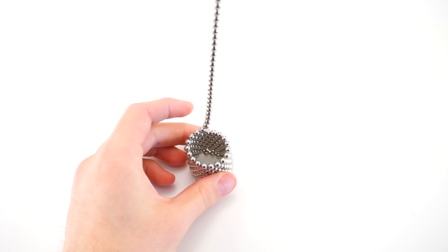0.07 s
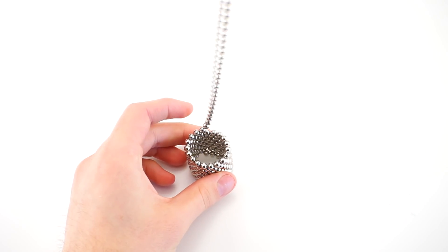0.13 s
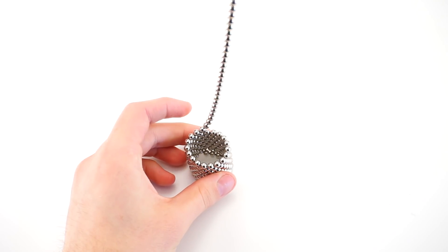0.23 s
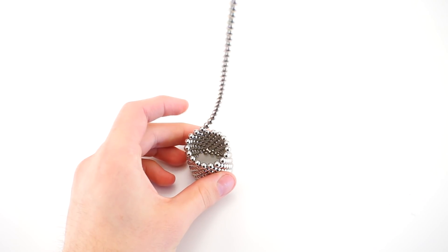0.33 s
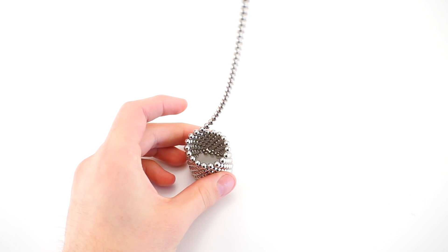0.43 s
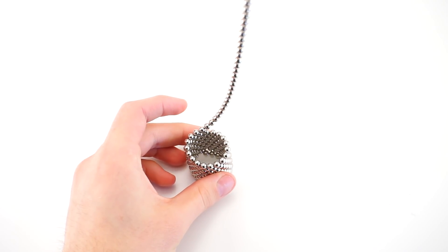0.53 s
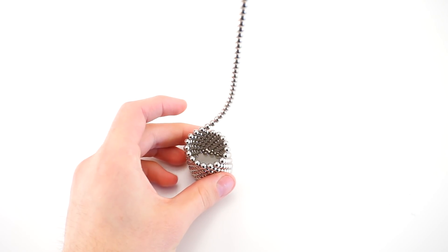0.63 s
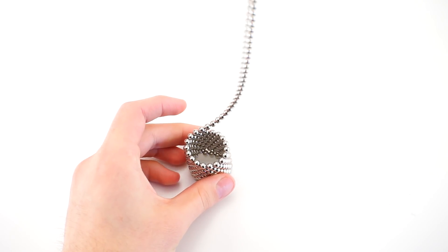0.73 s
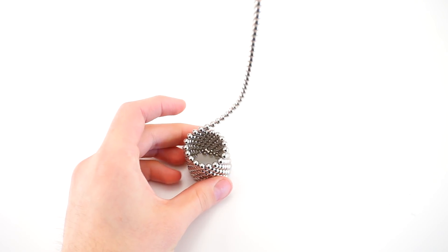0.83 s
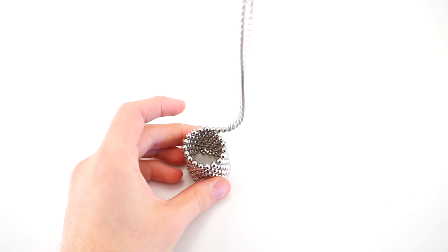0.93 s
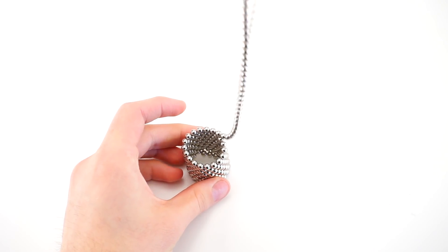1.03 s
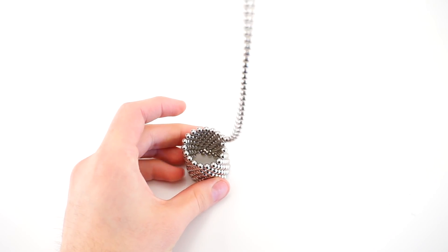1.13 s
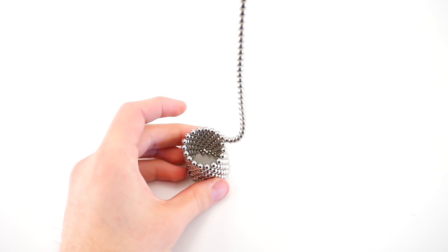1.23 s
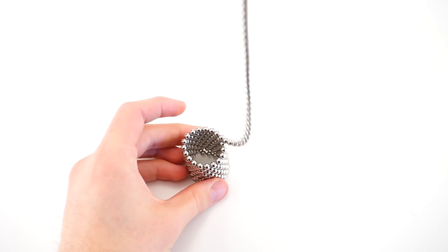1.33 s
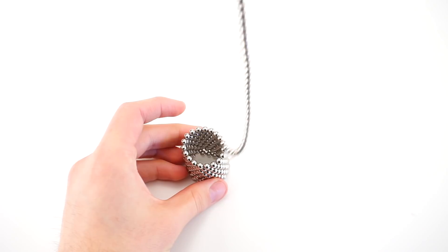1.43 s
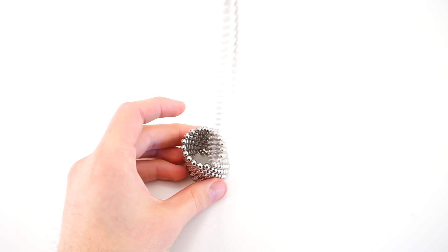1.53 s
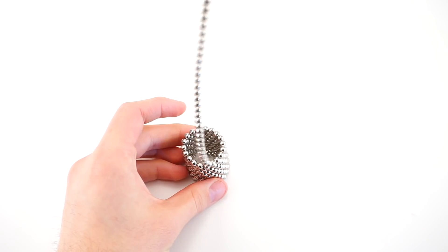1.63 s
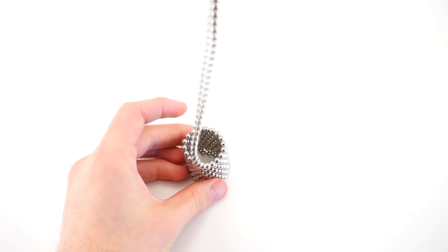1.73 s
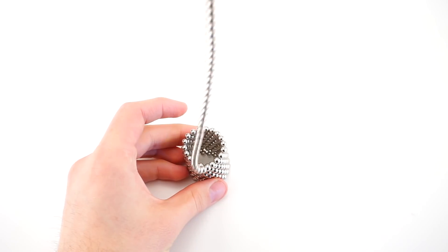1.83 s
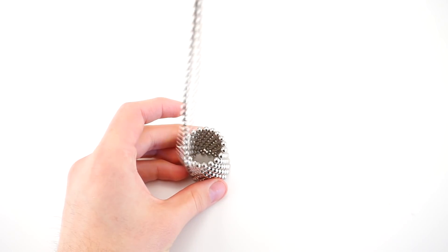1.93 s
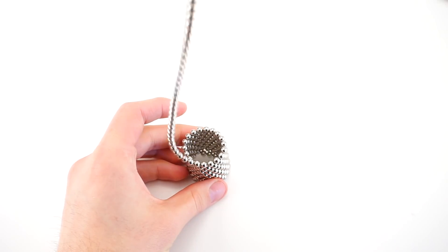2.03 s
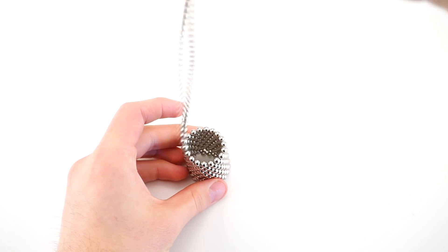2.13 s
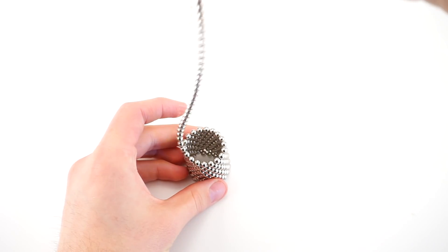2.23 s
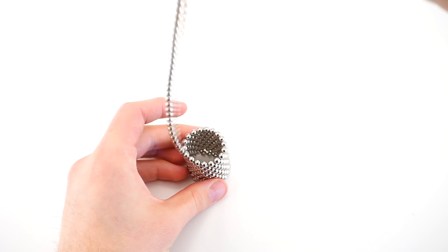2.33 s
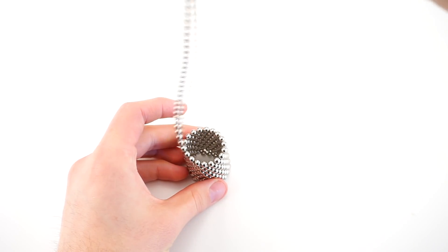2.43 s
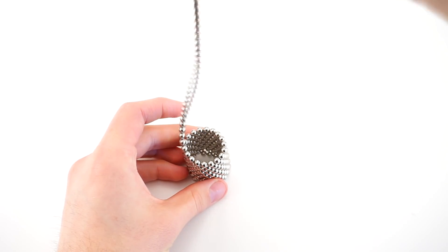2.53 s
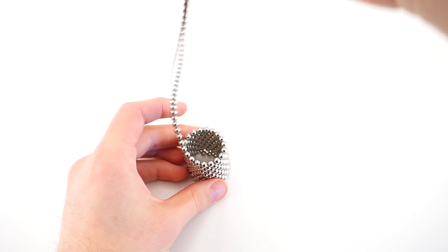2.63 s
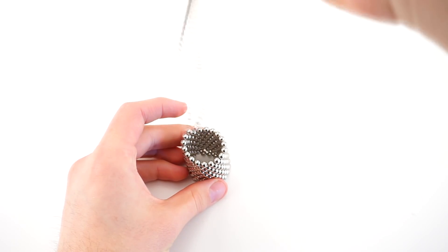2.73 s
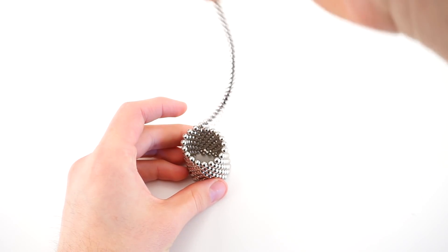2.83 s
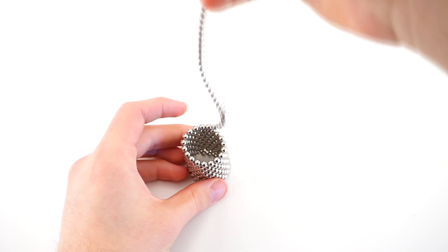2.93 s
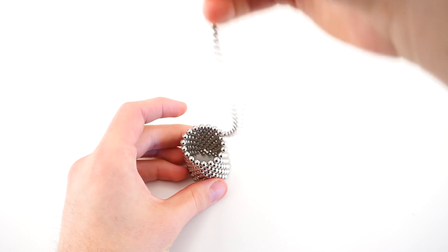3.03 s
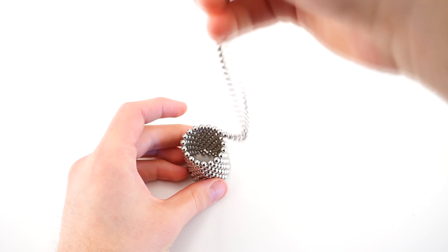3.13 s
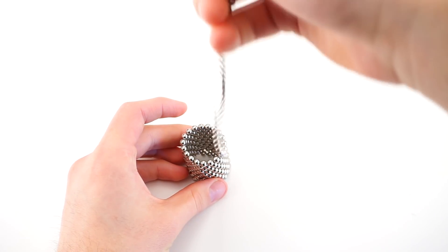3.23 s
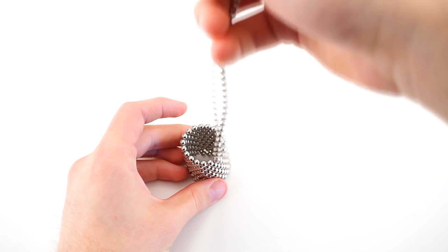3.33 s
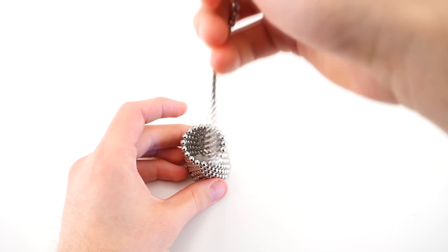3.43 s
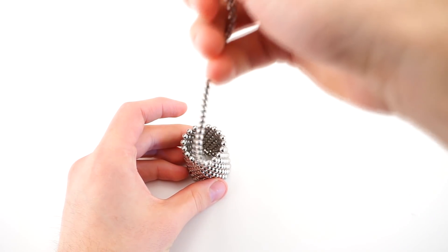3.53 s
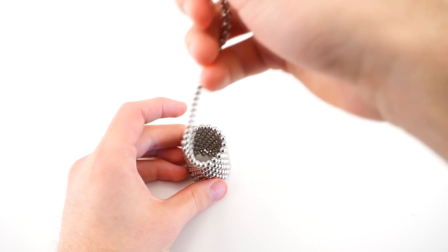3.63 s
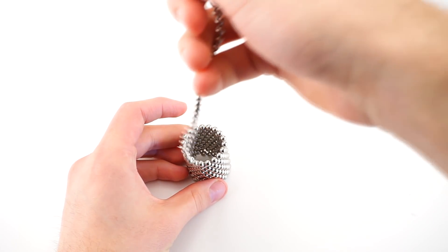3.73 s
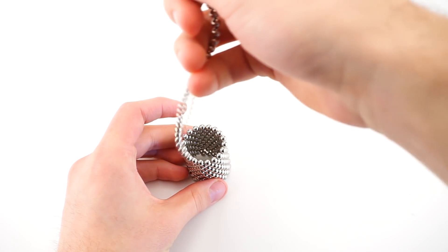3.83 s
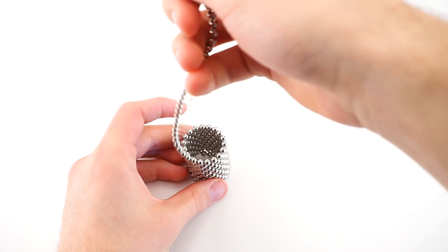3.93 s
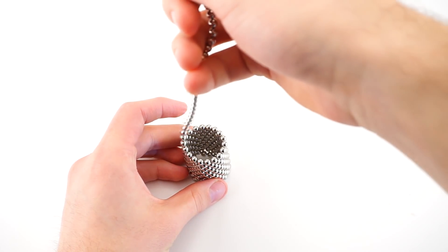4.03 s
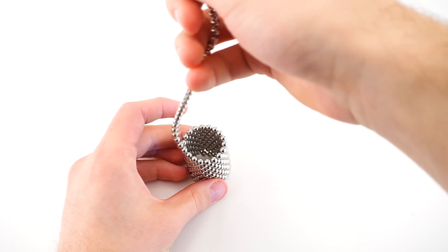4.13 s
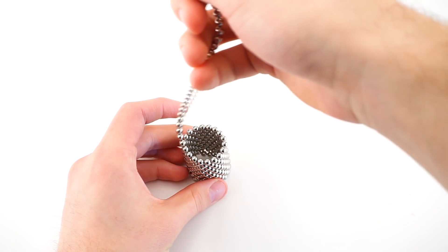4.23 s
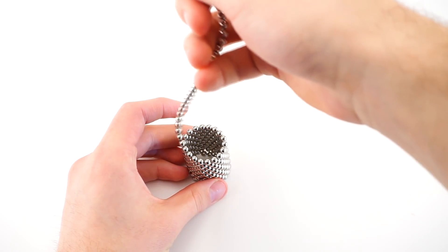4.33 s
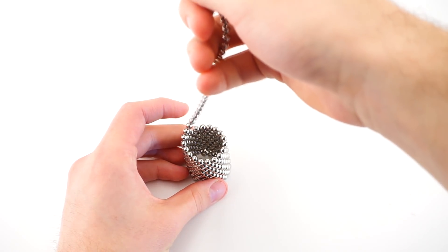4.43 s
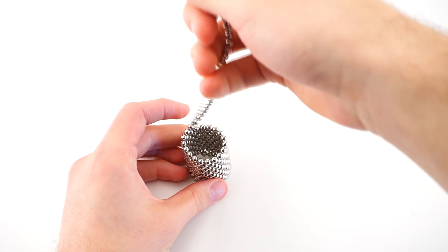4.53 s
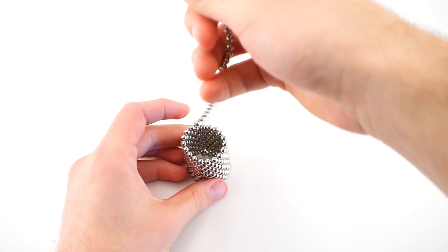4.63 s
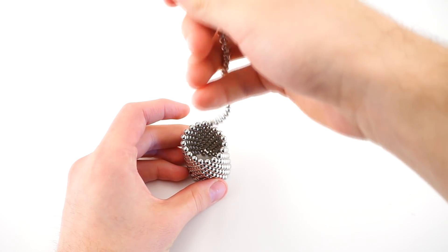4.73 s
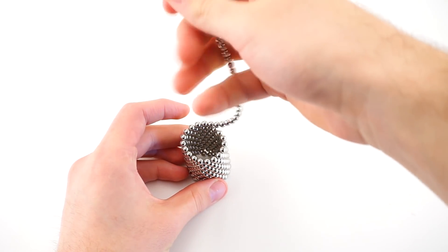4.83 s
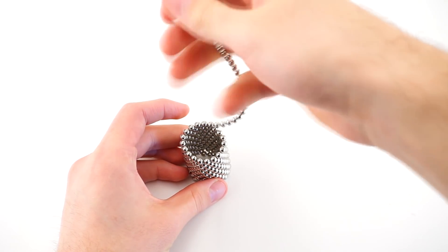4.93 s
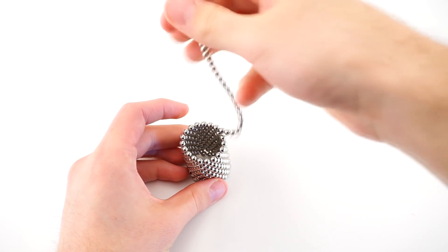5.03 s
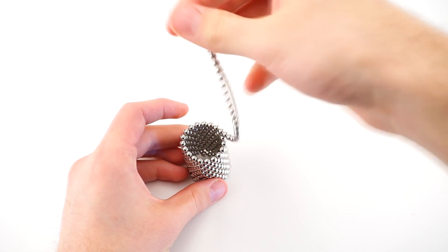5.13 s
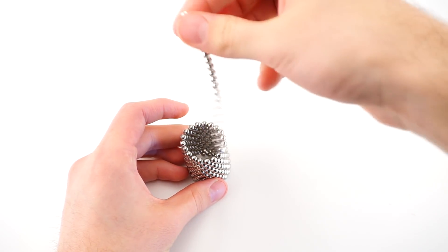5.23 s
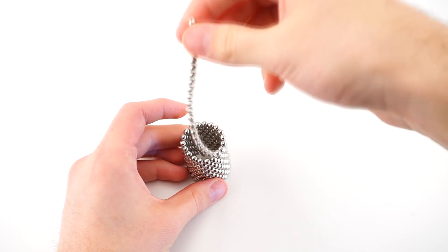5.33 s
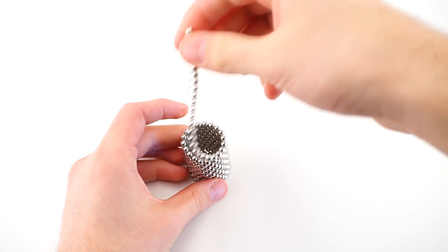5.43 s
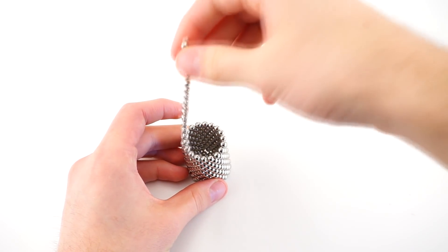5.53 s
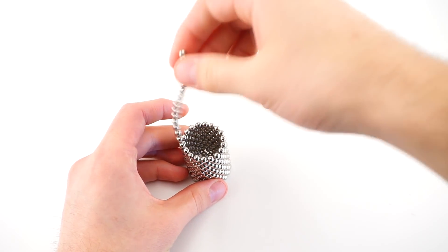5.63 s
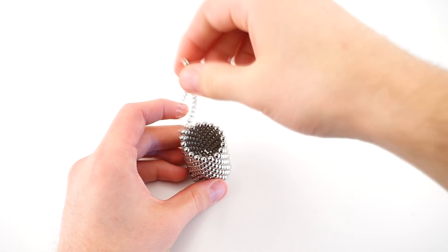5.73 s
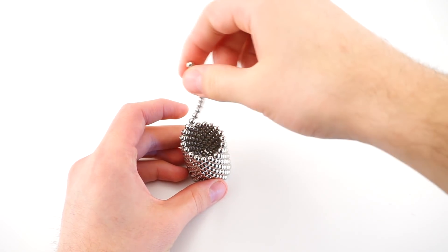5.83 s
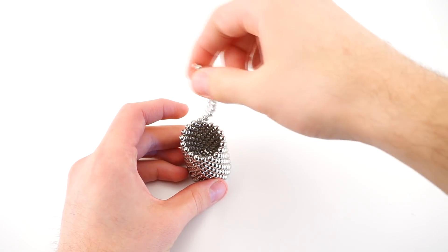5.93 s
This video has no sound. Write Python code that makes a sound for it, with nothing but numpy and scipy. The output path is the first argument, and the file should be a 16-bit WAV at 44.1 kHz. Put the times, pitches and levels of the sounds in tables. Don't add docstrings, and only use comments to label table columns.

```python
import sys
import numpy as np
from scipy import signal
from scipy.io import wavfile
from scipy.ndimage import uniform_filter1d

SR = 44100
rng = np.random.default_rng(int(sys.argv[2]) if len(sys.argv) > 2 else 0)


def pcm_store(signal):
    levels = np.round(np.clip(np.atleast_2d(signal), -1, 1) * 32767)
    wavfile.write(sys.argv[1], SR, levels.astype(np.int16).T)


def convert_level_to_amplitude(level_db):
    exponent = np.asarray(level_db, float) / 20
    return 10 ** exponent


N = 263718


def rms_one(x):
    return x / np.sqrt(np.mean(x ** 2) + 1e-20)


def at_hz(rows, hz):
    at, *columns = np.transpose(rows)
    return [np.interp(np.log(hz), np.log(at), c) for c in columns]


def ring(clicks, hz, t60_s):
    r = convert_level_to_amplitude(-60 / (t60_s * SR))
    w = 2 * np.pi * hz / SR
    return signal.lfilter([0, np.sin(w)], [1, -2 * r * np.cos(w), r * r], clicks + 1e-18)


def dying(t60_s, size):
    return convert_level_to_amplitude(-60 * np.arange(size) / SR / t60_s)


def bandpass(x, order, low_hz, high_hz):
    return signal.sosfilt(signal.butter(order, [low_hz, high_hz], "band", fs=SR, output="sos"), x)


def bands(size):
    edges_hz = 20 * 2 ** np.arange(0, 10.1, .5)
    white = rng.standard_normal((2, 2, size))
    for k, (low, high) in enumerate(zip(edges_hz, edges_hz[1:])):
        yield np.sqrt(low * high), bandpass(white[k % 2], 2, low, high)


def stereo(mid, side, alike):
    alike = np.clip(alike, -1, 1)
    return np.sqrt(1 + alike) * mid + np.sqrt(1 - alike) * side * [[1], [-1]]


def add(out, sound, s):
    i = round(s * SR)
    out[:, i:i + sound.shape[1]] += sound[:, :N - i]


# pitch_hz [Hz], level_db [dB per Hz]
HISS = [(12, -37), (20, -58), (53, -6.5), (75, -14.5), (99, -4), (506, -14.5), (772, -15.5), (3140, -27),
        (15200, -32), (16500, -30)]
# pitch_hz [Hz], likeness [-1 to 1]
HISS_LIKENESS = [(60, 0.92), (130, 0.88), (290, 0.46), (640, -0.42), (1410, -0.41), (3100, -0.15),
                 (6820, -0.16), (15000, 0.23)]
HISS_DB, HUM_HZ, HUM_DB = -55, 50, -64


def background():
    settle = 8000
    hiss = 0
    for hz, (mid, side) in bands(size=N + settle):
        hiss = hiss + convert_level_to_amplitude(at_hz(HISS, hz)[0]) * stereo(mid, side, *at_hz(HISS_LIKENESS, hz))
    hum = ring(rng.standard_normal(N + settle), HUM_HZ, t60_s=0.44)
    return convert_level_to_amplitude(HISS_DB) * rms_one(hiss[:, settle:]) + convert_level_to_amplitude(HUM_DB) * rms_one(hum[settle:])


# time_s [s], level_db [dB]
RUMBLE = [(0.0, -74), (0.7, -54), (1.08, -84), (1.5, -51), (1.75, -76), (1.95, -61), (2.33, -50),
          (2.55, -52), (5.98, -50.5)]


def rumble():
    s, level_db = np.transpose(RUMBLE)
    low = bandpass(rng.standard_normal(N + 8000), 2, 30, 110)
    return convert_level_to_amplitude(np.interp(np.arange(N) / SR, s, level_db) - 7.5) * rms_one(low[8000:])


# pitch_hz [Hz], level_db [dB], t60_s [s], likeness left to right [-1 to 1]
ROOM = [(151, -12.5, 0.78, 1), (358, -17.5, 0.36, 0.92), (519, -7, 0.5, 0.77), (1140, -12.5, 0.41, 0.38),
        (1600, -22.5, 0.79, -0.16), (2130, -19.5, 0.61, 0.17), (3300, -24, 0.59, -0.04),
        (5600, -20, 0.52, -0.13), (6800, -28, 0.67, -1.02), (9800, -28, 0.5, 0.4),
        (15100, -26, 0.24, -0.21)]


def room(x):
    size = 20000
    tail = 0
    for hz, (mid, side) in bands(size):
        level_db, t60_s, alike = at_hz(ROOM, hz)
        tail = tail + convert_level_to_amplitude(level_db) * stereo(mid, side, alike) * dying(t60_s, size)
    tail = tail * (1 - np.exp(-np.arange(size) / SR / .002)) / 20
    return signal.fftconvolve(x[None], tail, axes=1)[:, :N]


def knock(snaps):
    clicks = np.zeros(N)
    clicks[np.round(snaps[:, 0] * SR).astype(int)] = convert_level_to_amplitude(snaps[:, 2] + 16)
    return bandpass(clicks, 1, 450, 6000)


# delay_s [s], left_db [dB], right_db [dB]
ECHOES = [(.0008, -15, -15), (.0015, -14, -12), (.0024, -18, -19), (.003, -17, -15.5),
          (.0036, -12.5, -11.5), (.0043, -16.5, -14), (.0062, -21, -20)]
# pitch_hz [Hz], level_db [dB], t60_s [s]
CAVITY = (6130, -20, .012)


def reflections(blow):
    out = np.zeros((2, N))
    for delay_s, left_db, right_db in ECHOES:
        add(out, blow * convert_level_to_amplitude(np.array([[left_db], [right_db]])), delay_s)
    out = out + convert_level_to_amplitude(7.5) * signal.lfilter(*signal.butter(2, 7500, fs=SR), out)
    hz, level_db, t60_s = CAVITY
    return out + convert_level_to_amplitude(level_db) * ring(blow + 2 * out, hz, t60_s) * [[.6], [-1.2]]


def struck(snaps, modes, axis, spread_db, detune, size):
    hz, level_db, t60_s, direction = np.transpose(modes)[:, :, None]
    out, t = np.zeros((1, N)), np.arange(size) / SR
    shapes = convert_level_to_amplitude(level_db) * dying(t60_s, size) * np.sign(direction)
    variations = rng.standard_normal((len(snaps), 2, len(modes), 1))
    for snap, (strength, shift) in zip(snaps, variations):
        swing = np.sin(2 * np.pi * hz * (1 + detune * shift) * t)
        rings = convert_level_to_amplitude(snap[axis] + spread_db * strength) * shapes * swing
        add(out, rings.sum(axis=0, keepdims=True), snap[0] + .0003)
    return out[0]


TABLE_HZ = [130, 204, 260, 312, 340, 408, 436, 478, 533, 572, 630, 766, 840]
# level_db [dB], t60_s [s], direction at the microphones [sign]
TABLE_MODES = [(-31.5, .2, 1), (-5.5, 0.2, -1), (-5.5, 0.15, 1), (-5.5, 0.14, -1), (0, 0.095, -1),
               (-17.5, 0.079, 1), (-15.5, 0.15, 1), (-21.5, 0.18, -1), (-24.5, 0.15, 1), (-21.5, 0.19, 1),
               (-16.5, 0.085, -1), (-12.5, 0.039, 1), (-17.5, 0.028, 1)]


def table_thump(snaps):
    modes = np.c_[TABLE_HZ, TABLE_MODES]
    thump = struck(snaps, modes, axis=3, spread_db=2.2, detune=.005, size=14000)
    return bandpass(thump, 2, 120, 1200)


# pitch_hz [Hz], level_db [dB], t60_s [s], direction at the microphones [sign]
STACK_MODES = [(1070, -2, .03, 1), (1190, -6, .03, 1), (1720, -2, .03, 1), (2060, -5, .02, 1),
               (2250, -4, .02, 1), (3400, -4, .01, -1), (4450, -3, .01, 1), (5200, -5, .01, -1)]


def stack_ring(snaps):
    return struck(snaps, STACK_MODES, axis=2, spread_db=2.5, detune=.03, size=2500)


# start_s [s], crack_db [dB peak], stack_db [dB], thump_db [dB]
LEADS = [(0.9105, -15.5, -39, -40.5), (1.0648, -14, -35.5, -39), (1.1474, -14.5, -34.5, -37),
         (1.443, -17.5, -34, -37), (1.5147, -16, -33.5, -38), (1.5832, -13.5, -32, -38.0),
         (1.6744, -12.5, -33, -39), (1.9658, -12.5, -35, -40.0), (2.1154, -8.5, -31.5, -30.5),
         (2.5195, -12.5, -36.5, -31.5), (2.599, -16.5, -39, -32.5), (2.7053, -11.5, -35.5, -29.0),
         (2.8987, -12, -29, -31), (3.0201, -9, -29.5, -34.5), (3.2309, -8.5, -30.5, -38),
         (3.3749, -12.5, -36.5, -34.5), (3.5866, -13, -35.5, -36), (3.7568, -10.5, -32.5, -30.5),
         (4.0243, -9, -31.5, -30.5), (4.4131, -12.0, -33.5, -30.5), (4.5337, -8.5, -32.5, -31),
         (4.6301, -8, -32, -31), (4.722, -10.5, -29, -30), (5.01, -13, -33.5, -38),
         (5.2404, -10.5, -42, -33.5), (5.3285, -10, -33.5, -36.0), (5.5403, -12, -38.5, -31),
         (5.7563, -8, -31, -33.5), (5.9249, -10, -40, -33)]
# start_s [s], crack_db [dB peak], stack_db [dB], thump_db [dB]
FOLLOWERS = [(0.9281, -19, -37, -39), (1.9805, -13, -36.5, -34.5), (2.1427, -11.0, -27.0, -29.5),
             (2.7217, -13, -32, -27), (2.7789, -11, -42, -32.5), (2.8084, -16, -33.5, -36.5),
             (2.9272, -19.5, -36, -48), (3.081, -15.0, -30.5, -37.0), (3.2497, -10.5, -30, -33),
             (3.4334, -21.5, -35, -41.5), (3.7653, -9.5, -45, -35), (4.0612, -11.5, -29.5, -29),
             (4.4215, -15.5, -32.5, -35.5), (4.4662, -8.5, -35.5, -31), (4.7504, -9.0, -31, -29.5),
             (4.8045, -15.5, -36.5, -36.5), (5.0466, -17, -43, -42.5), (5.25, -14.5, -35.5, -34.5),
             (5.5447, -9, -40, -57.5), (5.575, -12.5, -37.5, -32), (5.5973, -10.5, -39, -40),
             (5.6293, -12.5, -42, -42), (5.6528, -10.5, -38, -32.5), (5.7715, -7, -47, -31.5),
             (5.7772, -10, -38, -32.5), (5.8068, -14, -42, -32), (5.9735, -7, -45, -29.5)]
# start_s [s], tick_db [dB peak], thump_db [dB]
NUDGES = [(0.6304, -58, -50), (0.6908, -63, -62), (1.0549, -34, -44), (1.4328, -26.5, -58),
          (2.761, -32, -66), (3.2271, -39, -34), (3.2962, -53, -54), (3.5678, -36, -38.5),
          (3.9183, -30.5, -43), (4.521, -50, -34.5), (4.696, -43, -68), (5.24, -42, -62),
          (5.4405, -60, -47), (5.5701, -28, -62), (5.8577, -32, -72), (5.9707, -50, -51)]
CRACK_HZ, CRACK_SPREAD_HZ, NUDGE_HZ = 13400, 700, 11900
PAN_DB, PAN_SPREAD_DB = 1.7, 2.4
NUDGE_RING_DB = -11.5


def contacts():
    nudges = [(s, tick_db, tick_db + NUDGE_RING_DB, thump_db) for s, tick_db, thump_db in NUDGES]
    rows = []
    for events, hz in ((LEADS, CRACK_HZ), (FOLLOWERS, CRACK_HZ), (nudges, NUDGE_HZ)):
        pitch, side = np.clip(rng.standard_normal((len(events), 2)).T, -2, 2)
        rows.append(np.c_[events, hz + CRACK_SPREAD_HZ * pitch, PAN_DB + PAN_SPREAD_DB * side])
    return np.concatenate(rows)


def crack_burst(hz, jolt, contact_s=.000135, width_hz=9000):
    t = np.arange(64) / SR
    carrier = np.cos(2 * np.pi * hz * t) + 0.67 * jolt[:64]
    burst = carrier * t * np.exp(-t / contact_s)
    r = np.exp(-np.pi * width_hz / SR)
    burst = signal.lfilter([1, 0, -1], [1, -2 * r * np.cos(2 * np.pi * hz / SR), r * r], burst)
    return burst / np.abs(burst).max()


def cracks(snaps, chatter_db, chatter_t60_s):
    size = 1500
    direct, chatter = np.zeros((2, N)), np.zeros((2, N))
    noise, t = rng.standard_normal((len(snaps), 3, size)), np.arange(size) / SR
    bright = signal.butter(1, 9000, "high", fs=SR)
    middle = signal.butter(1, [700, 6000], "band", fs=SR)
    settling = dying(chatter_t60_s, size) * (1 - np.exp(-t / 0.0003))
    rustling = dying(0.053, size)
    for (s, crack_db, stack_db, _, hz, pan_db), (jolt, *settle) in zip(snaps, noise):
        settle = np.array(settle)
        sides = convert_level_to_amplitude(crack_db - 0.93 + pan_db * np.array([[.5], [-.5]]))
        add(direct, sides * crack_burst(hz, jolt), s)
        grains = .35 * jolt + 0.85 * settle * np.abs(jolt)
        add(chatter, sides * convert_level_to_amplitude(chatter_db) * signal.lfilter(*bright, grains) * settling, s)
        rustle = signal.lfilter(*middle, 0.4 * settle + 1.24 * jolt) * rustling
        add(chatter, convert_level_to_amplitude(stack_db - 4.5) * rustle, s)
    return direct, chatter


def scene():
    snaps = contacts()
    direct, chatter = cracks(snaps, chatter_db=-6.0, chatter_t60_s=0.027)
    stack = stack_ring(snaps)
    table = table_thump(snaps)
    blow = direct + convert_level_to_amplitude(-13.5) * stack * convert_level_to_amplitude(np.array([[-1.2], [1.2]]))
    thump = convert_level_to_amplitude(-1.5) * table * convert_level_to_amplitude(np.array([[-.35], [.35]]))
    near = blow + chatter + reflections(blow) + thump
    to_room = (0.57 * direct + chatter).mean(axis=0) + knock(snaps) + convert_level_to_amplitude(-9) * table
    return near + convert_level_to_amplitude(9.5) * room(to_room) + background() + rumble()


def roll_off(x):
    return signal.sosfilt(signal.butter(12, 16980, fs=SR, output="sos"), x)


CUTOFF_HZ, QUIET_TOP_HZ, TOP_GATE_DB = 16900, 15750, -42


def record(dry):
    cut = signal.sosfilt(signal.cheby2(12, 60, CUTOFF_HZ, fs=SR, output="sos"), dry)
    body = signal.sosfiltfilt(signal.cheby1(10, .1, QUIET_TOP_HZ, fs=SR, output="sos"), cut)
    top = cut - body
    top_level = np.sqrt(np.abs(uniform_filter1d(top ** 2, size=128)))
    gate = uniform_filter1d(1. * (top_level > convert_level_to_amplitude(TOP_GATE_DB)), size=128)
    return roll_off(body + gate * top)


dry = scene()
out = record(dry)
pcm_store(out)
```